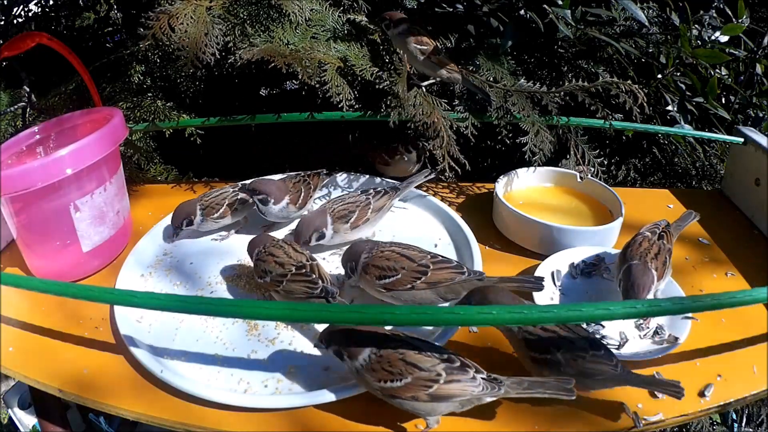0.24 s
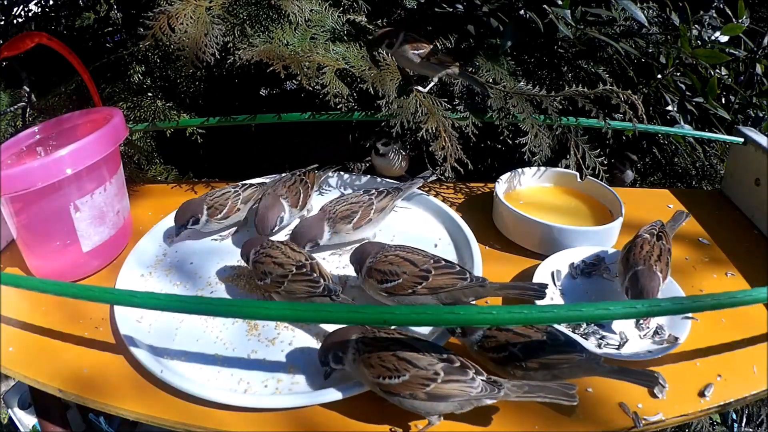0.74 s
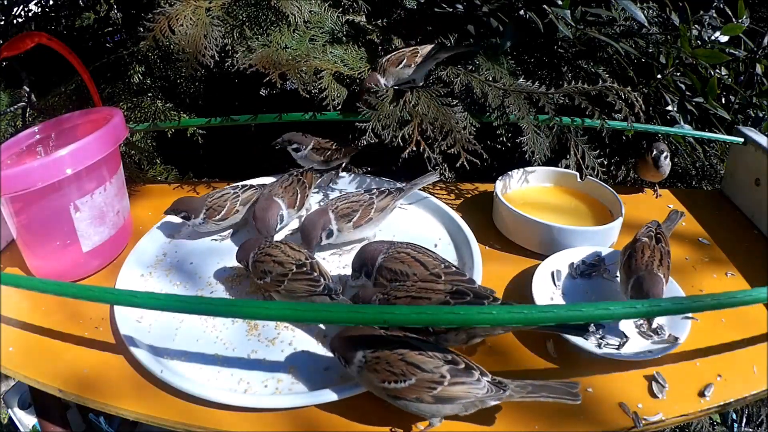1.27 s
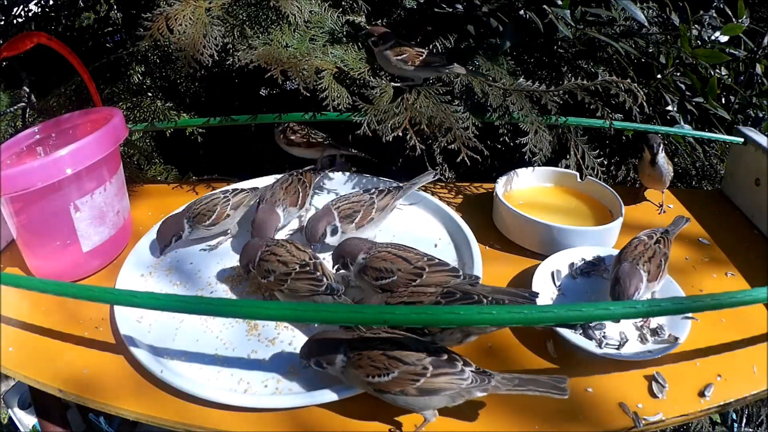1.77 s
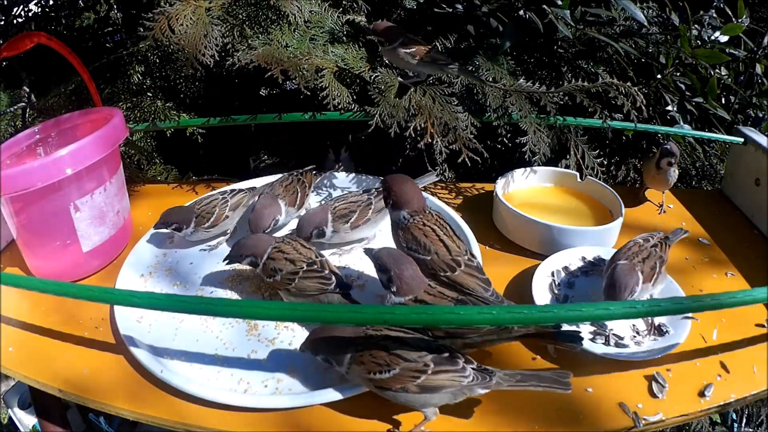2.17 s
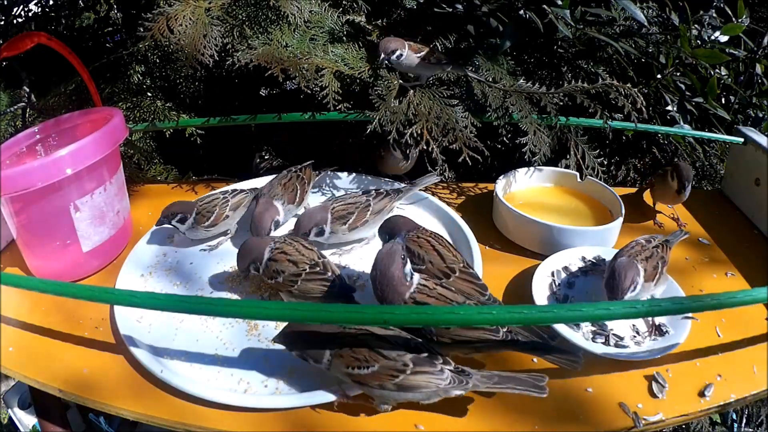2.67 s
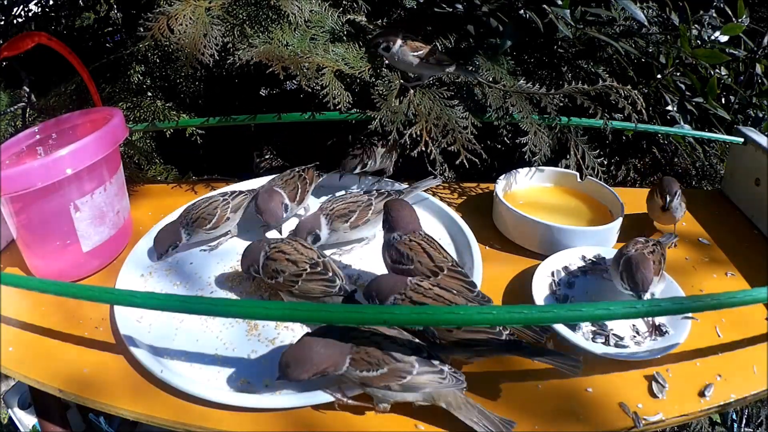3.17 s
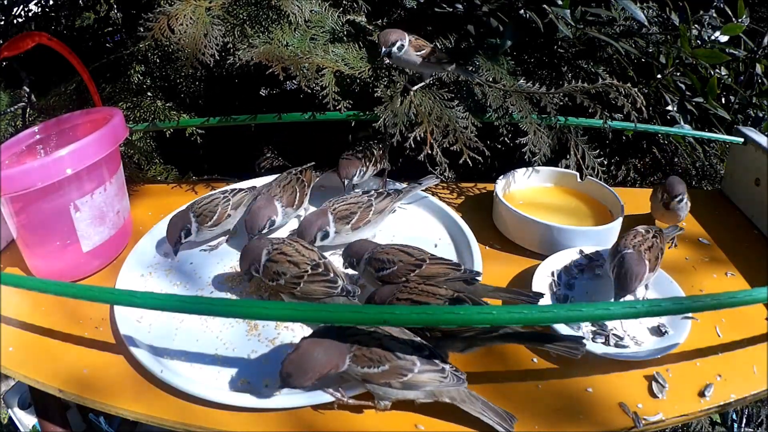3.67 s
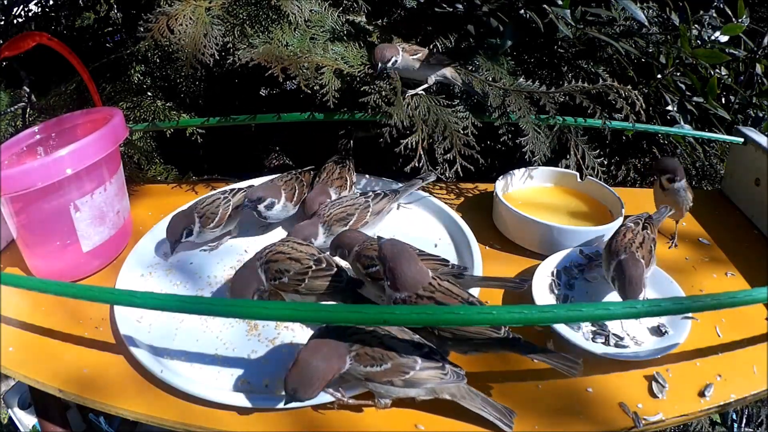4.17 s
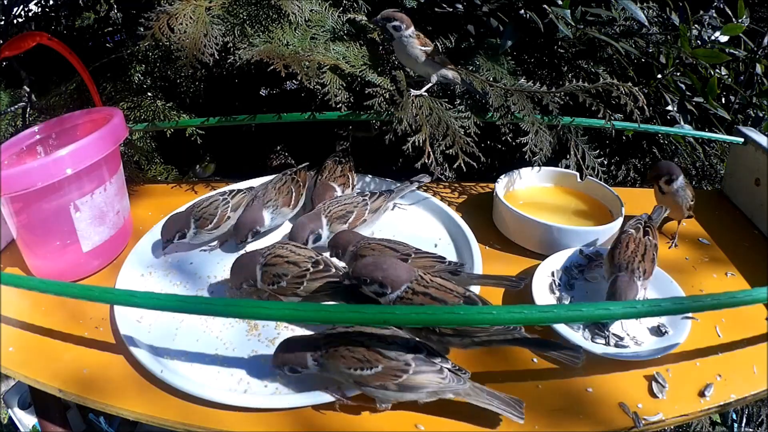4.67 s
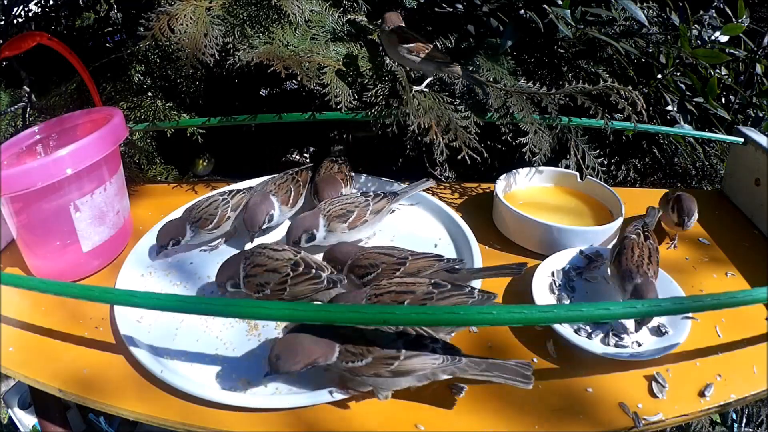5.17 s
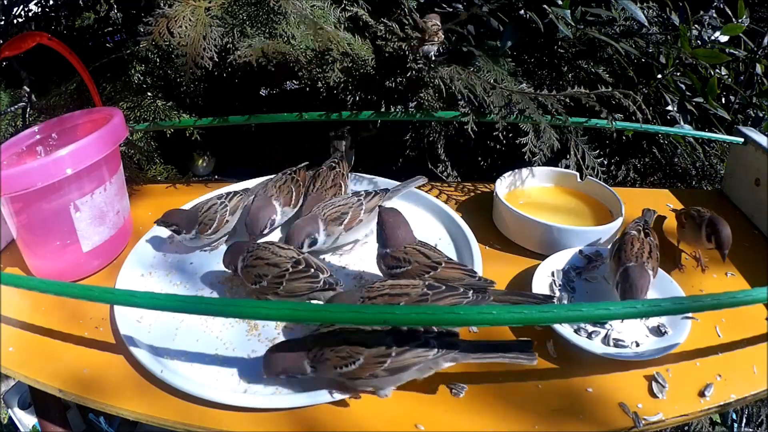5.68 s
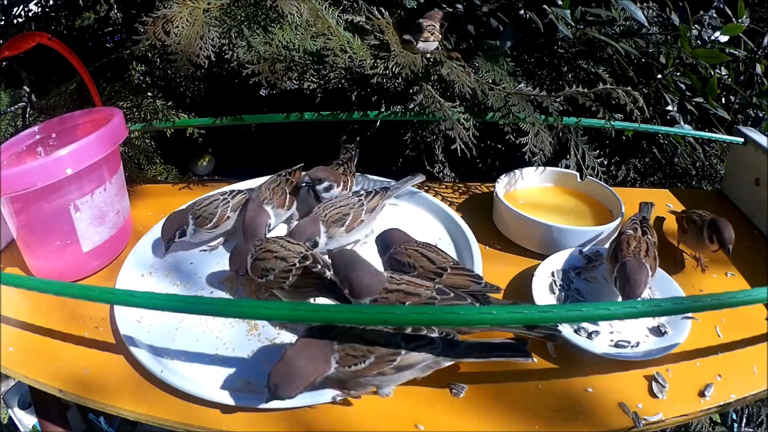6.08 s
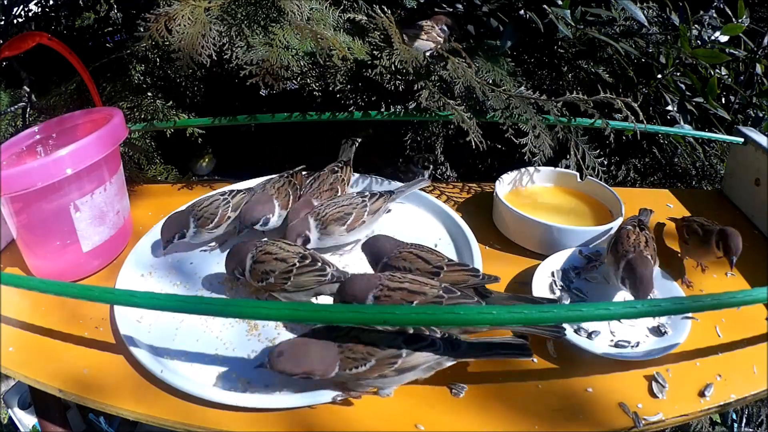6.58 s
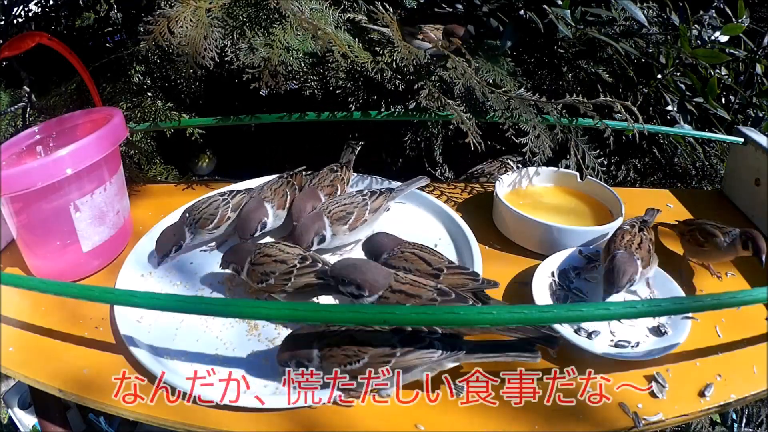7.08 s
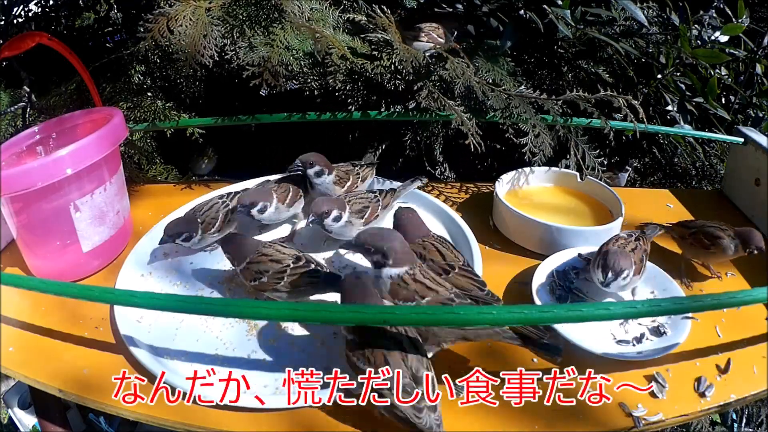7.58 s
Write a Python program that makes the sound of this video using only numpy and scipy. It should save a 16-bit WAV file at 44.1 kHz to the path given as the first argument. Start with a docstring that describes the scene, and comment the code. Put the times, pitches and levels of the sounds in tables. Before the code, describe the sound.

Sparrows peck busily at a ringing plate and small dish, with sparse chirps and seed cracks, before a sudden flutter of wings at the end.

```python
"""Sparrows peck at a plate on a garden table: each peck rings the plate's modes (its natural tones).
A small dish rings higher. Filtered noise makes seed crunches, snaps, table bumps and leafy air.
Calls are gliding whistles, squeaks have overtones, and water-like gurgles are short ringing tones.
Near the end birds take off, as noise pulsing with the wing beats. All is heard in close stereo."""
import sys
import numpy as np
from scipy import signal
from scipy.fft import rfft, irfft, next_fast_len
from scipy.io import wavfile
from scipy.ndimage import uniform_filter1d

SR = 44100
rng = np.random.default_rng(int(sys.argv[2]) if len(sys.argv) > 2 else 0)


def dump(signal):
    """Clip the signal to [-1, 1] and save it as 16-bit WAV at the path in sys.argv[1]."""
    limited = np.clip(np.atleast_2d(signal).T, -1, 1)
    pcm = np.round(limited * 32767).astype(np.int16)
    wavfile.write(sys.argv[1], SR, pcm)


N = 345303
TIME = np.arange(N) / SR  # seconds

# All levels in the tables are relative: settings in scene() shift many of them.
# t60 is the time a sound takes to fade by 60 dB.

# soft outdoor air and leaves: (frequency [Hz], level [dB])
GARDEN_SPECTRUM = [(25, -19), (100, -1), (330, 1), (700, -3.5), (1200, -9), (2000, -13), (2800, -9.5),
                   (4000, -15.5), (5000, -26), (5800, -49.5)]
# microphone hiss: (frequency [Hz], level [dB])
HISS_SPECTRUM = [(2000, -11.5), (5700, -11.5), (7000, -3), (9500, -1), (12000, -9.5), (15000, -22)]
GARDEN_DB = -55
# hollow blips, like water gurgling nearby: (time [s], pitch [Hz], level [dB])
GURGLES = [(3.284, 331, -39), (3.662, 496, -41), (4.942, 397, -38.5), (5.728, 317, -40.5),
           (6.283, 321, -39), (7.18, 347, -38.5)]

# birds take off past the microphone: (nearest moment [s], feather rustle [dB], downwash [dB])
TAKE_OFFS = [(7.56, -45.5, -58), (7.725, -48.5, -52), (7.807, -44, -34)]
# rustle of feathers: (frequency [Hz], level [dB])
RUSTLE_SPECTRUM = [(100, -1), (300, 6), (900, 3.5), (1700, -5), (2800, 9), (4200, -0.5), (5700, -23),
                   (9500, -15.5), (14000, -50)]
# draught pushed down by the wings: (frequency [Hz], level [dB])
DOWNWASH_SPECTRUM = [(20, -14), (50, -6.5), (85, 2), (160, -1), (300, -13), (900, -52)]
RUSTLE_APPROACH_DB_PER_S, LEAVE_DB_PER_S = 170, 135
DOWNWASH_APPROACH_DB_PER_S = 600  # the draught is felt only close by

# thin squeaks: (start [s], end [s], level [dB])
SQUEAKS = [(2.085, 2.221, -49.5), (7.458, 7.527, -47.5)]
# squeak tones from the lowest up: (level [dB])
SQUEAK_OVERTONES = [1, -11, -16.5, -21.5]
SQUEAK_HZ = 2557

# calls that arch up to a top pitch and fall away: (start [s], rise [s], fall [s], start pitch [Hz],
# top pitch [Hz], end pitch [Hz], level [dB], swell from start to end [dB], hidden by foliage [0-1])
CALLS = [(0.561, 0.013, 0.015, 2900, 3200, 2780, -38.5, -3, 0.43),
         (0.948, 0.015, 0.059, 3950, 4240, 2410, -49, 0, 1),
         (1.301, 0.041, 0.025, 2510, 3150, 2820, -44, -14, 0.9),
         (2.484, 0.12, 0.072, 4160, 4880, 2110, -46, 21, 0),
         (4.515, 0.0416, 0.023, 4300, 4650, 4600, -48.5, 7, 0.2),
         (4.590, 0.026, 0.083, 4300, 4950, 2140, -36.5, 10.5, 0),
         (4.796, 0.0081, 0.041, 4610, 4650, 3680, -48, 4, 0.15),
         (4.850, 0.042, 0.11, 2380, 2780, 2125, -42.5, -6, 0.04),
         (4.964, 0.0093, 0.028, 4470, 4570, 4100, -53, 0, 0.1),
         (5.179, 0.024, 0.017, 2430, 3230, 2880, -42.5, -12, 0.55),
         (6.574, 0.008, 0.04, 4430, 4620, 2730, -44.5, 5, 0.9)]
RISE_CURVE, FALL_CURVE = 0.84, 2.3  # the pitch climbs almost evenly, then drops ever faster
CALL_FADE_S = 0.0065
CALL_EDGE_HZ = 4740  # the whistle thins out above this pitch

# husks and wing tips snap: (time [s], body [dB], treble [dB])
SNAPS = [(0.1065, -40, -59), (0.1224, -29.5, -53), (0.7245, -38.5, -55.5), (1.1504, -45, -50),
         (1.732, -62, -50), (2.0947, -42, -48), (2.2177, -26.5, -41.5), (2.2888, -42, -60),
         (2.7127, -35, -49), (3.1487, -41.5, -58.5), (4.303, -38.5, -60), (5.4647, -31, -44.5),
         (6.101, -46, -49), (7.5428, -35, -45.5), (7.5725, -26, -39.5), (7.615, -36.5, -46),
         (7.636, -34.5, -41), (7.6928, -37, -45)]
# body of a snap, also the crunch of seed: (frequency [Hz], level [dB])
SNAP_BODY_SPECTRUM = [(500, -24.5), (1800, -14.5), (2800, -0.5), (4100, -7), (4900, -13), (5800, -39),
                      (12000, -52)]
# treble of a snap: (frequency [Hz], level [dB])
SNAP_TREBLE_SPECTRUM = [(3000, -24), (6000, 0), (7500, 5), (10000, 7.5), (11500, -9), (15000, -26)]

# feet and bodies bump the table: (time [s], clack [dB], thud [dB])
KNOCKS = [(0.1225, -38.5, -51.5), (0.529, -41, -39.5), (2.614, -48, -51), (2.679, -25, -34.5),
          (2.799, -40, -65), (5.227, -47, -50), (7.564, -44, -42), (7.814, -44.5, -42)]
# clack of the board, also the tick of a peck: (frequency [Hz], level [dB])
CLACK_SPECTRUM = [(50, -26), (200, -15), (600, -0.5), (1100, 1.5), (1550, -1.5), (2400, -2.5), (3000, -2),
                  (4000, -15.5), (4900, -32), (6000, -53), (9500, -31.5), (14000, -60)]
# low thud of the table: (frequency [Hz], level [dB])
THUD_SPECTRUM = [(45, -54), (120, -42), (190, 5), (300, 6.5), (500, 1.5), (800, -5.5), (2000, -48)]

# beak on the small dish: (time [s], level [dB])
DISH_PECKS = [(1.514, -50), (1.725, -44.5), (1.915, -43), (2.078, -47.5), (2.1138, -40), (2.5773, -42.5),
              (2.7667, -42.5), (3.031, -47.5), (3.125, -46.5), (4.507, -51), (4.744, -44.5), (4.842, -44),
              (5.0696, -46), (5.7236, -46.5), (5.804, -46.5), (6.4967, -48.5), (6.7242, -51),
              (6.8635, -53.5), (6.937, -49), (7.727, -44)]
# modes of the dish: (frequency [Hz], level [dB], t60 [s])
DISH_MODES = [(1556, -2, 0.059), (2524, -1, 0.11), (2777, -1, 0.11), (3470, -20, .012), (3940, -1.5, 0.075),
              (4870, -17, .02)]

# beak on the plate: (time [s], strength [dB], place round the rim [degrees])
PECKS = [(0.2204, -35, 24), (0.2334, -39.5, 42), (0.4319, -32.5, 67), (0.5894, -37.5, 172),
         (0.7472, -39, 120), (0.8315, -38.5, 74), (0.8784, -34.0, 163), (0.9263, -36.5, 66),
         (0.9394, -45, 60), (1.0909, -35.5, 166), (1.1044, -43, 54), (1.1578, -40.5, 11),
         (1.2915, -37, 115), (1.4007, -42.5, 127), (1.5319, -42, 145), (1.6008, -46.5, 62),
         (1.6207, -43, 148), (1.6661, -43.5, 130), (1.7898, -41.5, 82), (1.8113, -39, 159),
         (1.9619, -40, 150), (2.0208, -32, 34), (2.1484, -39.5, 150), (2.4014, -39, 76),
         (2.8669, -42.5, 107), (2.9632, -40.5, 88), (3.2136, -47.5, 140), (3.2475, -43.5, 73),
         (3.4116, -40, 68), (3.454, -38, 73), (3.4734, -45.5, 69), (3.5074, -36.5, 97), (3.6326, -44, 131),
         (3.676, -45, 150), (3.708, -42.0, 125), (3.8736, -40.5, 58), (3.922, -35.0, 36),
         (4.0392, -39, 38.2), (4.0911, -37.5, 66), (4.1155, -39, 124), (4.1934, -46, 205),
         (4.2532, -42, 143), (4.4218, -38, 117.5), (4.4727, -43.5, 68), (4.5511, -44, 56),
         (4.6354, -33.0, 152), (4.7654, -46.0, 61), (4.8544, -38, 104), (4.9244, -35.5, 120),
         (4.9731, -39.5, 150), (5.0888, -41.5, 38), (5.1038, -40.5, 35), (5.1567, -39.5, 144),
         (5.3462, -35.5, 34), (5.442, -36, 35), (5.671, -36.5, 135), (5.8721, -37.5, 35),
         (5.9963, -37, 107), (6.098, -39.5, 65), (6.3435, -32.5, 60), (6.3954, -40, 99),
         (6.5884, -35.5, 77), (6.6628, -41.0, 172), (6.9731, -40.5, 122), (7.0125, -45.5, 57),
         (7.236, -38.5, 166), (7.2903, -38.5, 101), (7.4525, -40, 122), (7.5068, -32.0, 127)]
# modes of the plate, one list per family: (frequency [Hz], level [dB], t60 [s])
PLATE_FAMILIES = [
    [(765.6, 2.5, 0.13), (900, -8, 0.12)],
    [(1510.6, 5, 0.093), (1570, 8.5, 0.011)],
    [(2406.4, 3.5, 0.092), (2353, -1, 0.093)],
    [(2671, 5.5, 0.035), (2913, 4, 0.012), (3476, 1, 0.042), (3850, 0, 0.036), (4097, -7.5, 0.033),
     (4840, -14.5, 0.055), (5200, -19.5, 0.06), (5420, -16, 0.035)],
]
# how the three low families bend the rim in waves; a peck on a crest rings them,
# one on a node (a still point) hardly does: (waves round the rim [count], offset [degrees])
RIM_WAVES = [(2, 0), (3, 60), (4, 150)]
NODE_DB = -19.5  # what still rings on a node
GRAZE_LEAD_S, GRAZE_DB = 0.012, -26.5  # typical lead: the beak brushes the seed before it lands
REBOUND_S, REBOUND_DB = 0.01, -14  # typical delay: it touches again as it closes

# the two microphone ports resonate at different pitches:
# (frequency [Hz], left minus right [dB], left lead [radians])
PORTS = [(100, 3, 0.28), (515, 3, 0.55), (1480, 5, 0.16), (2420, 9.5, 1), (2720, 14, -0.83),
         (3470, 5.5, -1.95), (3550, -3, -1.5), (4470, -10, -0.75), (4840, -9.5, -1.67), (6040, -4, 0.13),
         (10200, -1, -0.67)]


def from_db(db):
    """Turn decibels into gain."""
    return 10 ** (np.asarray(db) / 20)


def rms_one(x):
    """Scale to unit power."""
    return x / np.sqrt(np.mean(x ** 2) + 1e-20)


def at_hz(points, hz, axis=1):
    """Read one column of a spectrum between its points, on a log-frequency axis."""
    points = np.array(points)
    return np.interp(np.log(hz + 1), np.log(points[:, 0]), points[:, axis])


def colour(x, spectrum, size=2048):
    """Filter with the given spectrum and unit energy; minimum phase puts the energy early."""
    cepstrum = irfft(np.log(from_db(at_hz(spectrum, np.fft.rfftfreq(size, 1 / SR)))))
    # fold the cepstrum forward in time, so nothing sounds before its cause
    cepstrum[1:size // 2] *= 2
    cepstrum[size // 2 + 1:] = 0
    response = irfft(np.exp(rfft(cepstrum)))
    response /= np.linalg.norm(response)
    return signal.oaconvolve(np.atleast_2d(x), [response], axes=-1)[:, :N]


def white(alike):
    """Stereo white noise; alike is the share of power common to both sides."""
    alike = np.clip(alike, 0, 1)
    shared = np.sqrt(alike) * rng.standard_normal(N)
    return shared + np.sqrt(1 - alike) * rng.standard_normal((2, N))


def noise(spectrum, alike):
    """Steady coloured stereo noise."""
    return colour(white(alike), spectrum)


def drift(rate):
    """Smooth random wander of spread 1; a higher rate [Hz] wanders faster."""
    r = np.exp(-2 * np.pi * rate / SR)
    return rms_one(signal.lfilter([1], [1, -2 * r, r * r], rng.standard_normal(N)))


def clicks(times, heights):
    """One single-sample click per contact."""
    out = np.zeros(N)
    places = np.clip(np.round(times * SR).astype(int), 0, N - 1)
    np.add.at(out, places, heights)
    return out


def ring(x, hz, t60):
    """A unit click sets a fading sine of height 1 ringing."""
    r = from_db(-60 / (t60 * SR))
    w = 2 * np.pi * hz / SR
    return signal.lfilter([0, np.sin(w)], [1, -2 * r * np.cos(w), r * r], x + 1e-18)


def burst(x, t60, alike):
    """Each click starts a puff of white noise that dies away."""
    r = from_db(-60 / (t60 * SR))
    envelope = signal.lfilter([1], [1, -r], np.abs(x) + 1e-18)
    return envelope * white(alike)


def soften(x, edge_hz, order=6):
    """Cut the treble above an edge, as when a beak stays in contact for a moment."""
    return signal.sosfilt(signal.butter(order, edge_hz, fs=SR, output="sos"), x)


def pan(x, left_minus_right_db):
    """Make one side louder than the other."""
    return x * from_db([[left_minus_right_db / 2], [-left_minus_right_db / 2]])


def garden(swell_db, hiss_db):
    """Outdoor air and leaves, wandering in level, over each microphone's own hiss."""
    level = from_db(GARDEN_DB + swell_db * drift(17.7))
    air = level * noise(GARDEN_SPECTRUM, alike=0.78)
    return air + from_db(hiss_db) * noise(HISS_SPECTRUM, alike=0)


def hedge(x, t60, delay_s, size=16384):
    """Hedge and wall scatter sound into a fading noise tail, different on each side."""
    t = TIME[:size]
    tails = rng.standard_normal((2, size)) * from_db(-60 * t / t60) * (t > delay_s)
    tails /= np.linalg.norm(tails[0])
    return signal.fftconvolve(np.atleast_2d(x), tails, axes=-1)[:, :N]


def gurgle(per_s, level_db, spread_db, cycles, count=14):
    """Bubbles ring at low, hollow pitches; each fades by 60 dB over the given number of cycles."""
    out = np.zeros(N)
    for s, hz, db in GURGLES:
        out += ring(clicks(np.array([s]), from_db(db)), hz, cycles / hz)
    # fainter bubbles at random moments
    for hz in np.geomspace(230, 640, count):
        times = rng.uniform(0, N / SR, 200)
        born = rng.random(len(times)) < per_s * N / SR / count / len(times)
        spread = spread_db * np.clip(rng.standard_normal(len(times)), -2, 2)
        out += ring(clicks(times, from_db(level_db + spread) * born), hz, cycles / hz)
    return soften(out, edge_hz=970, order=2)


def fly_by(s, db, approach_db_per_s):
    """Gain that grows until a bird is nearest and fades as it leaves."""
    return from_db(db - np.maximum(approach_db_per_s * (s - TIME), LEAVE_DB_PER_S * (TIME - s)))


def wings(beat_hz, beat_db):
    """Feather noise swells on every wing beat and the downwash buffets the microphone."""
    rustle = sum(fly_by(s, db, RUSTLE_APPROACH_DB_PER_S) for s, db, _ in TAKE_OFFS)
    wash = sum(fly_by(s, db, DOWNWASH_APPROACH_DB_PER_S) for s, _, db in TAKE_OFFS)
    beat = beat_db * np.sin(2 * np.pi * beat_hz * TIME + drift(16.0))
    feathers = rustle * from_db(beat) * noise(RUSTLE_SPECTRUM, alike=0.95)
    return feathers + wash * noise(DOWNWASH_SPECTRUM, alike=0.89)


def squeaks(waver, flutter_db):
    """A stuttering squeak around one pitch, with a row of overtones at whole multiples."""
    gate = sum(from_db(db) * ((TIME > start) & (TIME < end)) for start, end, db in SQUEAKS)
    phase = 2 * np.pi * np.cumsum(SQUEAK_HZ * (1 + waver * drift(206))) / SR
    tone = np.zeros(N)
    for multiple, db in enumerate(SQUEAK_OVERTONES, start=1):
        level = from_db(db + flutter_db * np.tanh(drift(70)))
        tone += level * np.sin(multiple * phase)
    return uniform_filter1d(gate, size=300) * tone  # rounded edges avoid clicks


def calls(waver, flutter_db, octave_db):
    """Arching near-sine whistles with a faint octave: all that is sung, and the unhidden part."""
    sung, direct = np.zeros((2, N))
    wobble = 1 + waver * drift(109)
    flutter = flutter_db * np.tanh(drift(70))
    for start, rise, fall, start_hz, top_hz, end_hz, db, swell_db, hidden in CALLS:
        length = rise + fall
        on = (TIME > start) & (TIME < start + length)
        t = TIME[on] - start
        climb = np.maximum(1 - t / rise, 0) ** RISE_CURVE
        drop = np.maximum((t - rise) / fall, 0) ** FALL_CURVE
        hz = top_hz - (top_hz - start_hz) * climb - (top_hz - end_hz) * drop
        phase = 2 * np.pi * np.cumsum(hz * wobble[on]) / SR
        fade = np.minimum(np.minimum(t, length - t) / CALL_FADE_S, 1)
        level = from_db(db + swell_db * (t / length - .5) + flutter[on]) * fade
        # where the whistle thins, its octave comes out
        full = 1 / (1 + (hz / CALL_EDGE_HZ) ** 20)
        octave = (1 - full) * from_db(octave_db) * np.sin(2 * phase)
        whistle = level * (full * np.sin(phase) + octave)
        sung[on] += whistle
        direct[on] += whistle * (1 - np.clip(hidden, 0, 1))
    return np.sqrt(2) * sung, np.sqrt(2) * direct


def snaps(crack_db, body_db, treble_db):
    """Dry cracks: one sharp break and a few milliseconds of splintering noise."""
    s, body, treble = np.transpose(SNAPS)
    low = clicks(s, from_db(body + body_db))
    high = clicks(s, from_db(treble + treble_db))
    low_crack = from_db(crack_db) * low + burst(low, t60=0.023, alike=0.86)
    high_crack = from_db(crack_db) * high + burst(high, t60=0.022, alike=0.084)
    return colour(low_crack, SNAP_BODY_SPECTRUM) + colour(high_crack, SNAP_TREBLE_SPECTRUM)


def table(strike_db, clack_db, thud_db):
    """A bump gives a sharp contact, a dense clack of the board, and a longer low thud."""
    s, clack, thud = np.transpose(KNOCKS)
    hits = clicks(s, from_db(clack))
    board = from_db(strike_db) * hits + from_db(clack_db) * burst(hits, t60=0.13, alike=0.76)
    low = burst(clicks(s, from_db(thud + thud_db)), t60=0.28, alike=0.85)
    return colour(board, CLACK_SPECTRUM) + colour(low, THUD_SPECTRUM)


def nibbling(per_s, crumbs_per_s, ring_db, husk_db, spread_db):
    """Claws and rolling seed touch faintly at random: small plate rings and puffs of noise."""
    sizes = from_db(spread_db * np.clip(rng.standard_normal(N), -2, 2))
    touches = sizes * (rng.random(N) < per_s / SR)
    rings = np.zeros(N)
    for family in PLATE_FAMILIES:
        hz, db, t60 = family[0]
        rings += ring(touches * from_db(db), hz, t60)
    crumbs = sizes * (rng.random(N) < crumbs_per_s / SR)
    puffs = burst(crumbs, t60=0.016, alike=0.14)
    husks = colour(puffs, SNAP_BODY_SPECTRUM) + from_db(-19.5) * colour(puffs, SNAP_TREBLE_SPECTRUM)
    return from_db(ring_db) * rings + from_db(husk_db) * husks


def dish(level_db, scatter_db, grit_db, pan_db):
    """Pecks ring the modes of the small dish, with a short crunch of seed."""
    s, level = np.transpose(DISH_PECKS)
    rings = np.zeros(N)
    for hz, db, t60 in DISH_MODES:
        scatter = rng.standard_normal(len(s)) * scatter_db
        rings += ring(clicks(s, from_db(level + level_db + db + scatter)), hz, t60)
    crunch = burst(clicks(s, from_db(level + grit_db)), t60=0.02, alike=0.53)
    return pan(soften(rings, edge_hz=5500) + colour(crunch, SNAP_BODY_SPECTRUM), pan_db)


def mode_shapes(degrees):
    """Level [dB] at which a peck at this place drives each family; upper modes answer anywhere."""
    crests = [np.cos(np.radians(waves * degrees + offset)) for waves, offset in RIM_WAVES]
    return [20 * np.log10(np.hypot(crest, from_db(NODE_DB))) for crest in crests] + [0]


def plate(family_db, scatter_db, grit_db, tick_db, pan_db):
    """Pecks ring the plate's modes by where they land; seed crunches briefly under the beak."""
    s, strength, degrees = np.transpose(PECKS)
    graze, rebound = rng.uniform(.5, 1.5, (len(s), 2)).T  # timing varies from peck to peck

    def touches(db):
        """Graze, blow and rebound of every peck."""
        before = clicks(s - GRAZE_LEAD_S * graze, from_db(db + GRAZE_DB))
        after = clicks(s + REBOUND_S * rebound, from_db(db + REBOUND_DB))
        return before + clicks(s, from_db(db)) + after

    rings = np.zeros(N)
    for modes, shape, trim in zip(PLATE_FAMILIES, mode_shapes(degrees), family_db):
        for k, (hz, db, t60) in enumerate(modes):
            # the first mode of a family stays steady, the others vary
            scatter = rng.standard_normal(len(s)) * scatter_db * (k > 0)
            blows = touches(strength + shape + trim + db + scatter)
            # neighbouring modes start in opposite phase, so the ring swells for a moment
            rings += (-1) ** k * ring(blows, hz, t60)
    crunch = burst(touches(strength + grit_db), t60=0.036, alike=0.6)
    tick = burst(touches(strength + tick_db), t60=0.032, alike=0.87)
    contact = colour(crunch, SNAP_BODY_SPECTRUM) + colour(tick, CLACK_SPECTRUM)
    return pan(soften(rings, edge_hz=5100) + contact, pan_db)


def scene():
    """Everything on the table, with a little scatter from the garden; callers sit in the hedge."""
    pecks = plate(family_db=[-1.0, -2.5, 2.5, -4.0], scatter_db=5, grit_db=-6.0, tick_db=-6, pan_db=1.5)
    pecks += dish(level_db=1.5, scatter_db=2, grit_db=7.0, pan_db=0.0)
    pecks += nibbling(per_s=14, crumbs_per_s=35, ring_db=-58.5, husk_db=-51.0, spread_db=5.5)
    bumps = table(strike_db=21.5, clack_db=6.0, thud_db=3.5)
    bumps += snaps(crack_db=14, body_db=2, treble_db=-3.5)
    sung, direct = calls(waver=0.016, flutter_db=4.0, octave_db=-25)
    near = pecks + bumps + squeaks(waver=0.0085, flutter_db=12.0) + wings(beat_hz=24, beat_db=4.0)
    scatter = from_db(-13.5) * hedge(near, t60=0.19, delay_s=0.0058)
    scatter += from_db(-4) * hedge(sung, t60=0.23, delay_s=0.005)
    water = gurgle(per_s=20, level_db=-53.0, spread_db=5.0, cycles=31.5)
    return near + direct + scatter + water + garden(swell_db=3.0, hiss_db=-73.0)


def record(dry):
    """The ports share out each pitch between left and right; a narrow notch and a top cut follow."""
    size = next_fast_len(N + 4096)
    hz = np.fft.rfftfreq(size, 1 / SR)
    # each side takes half of the level and phase difference
    half = from_db(at_hz(PORTS, hz) / 2) * np.exp(.5j * at_hz(PORTS, hz, axis=2))
    ports = np.array([half, 1 / half])
    ports /= np.sqrt(np.mean(np.abs(ports) ** 2, axis=0))
    heard = irfft(rfft(dry, size) * ports, size)[:, :N]
    heard = signal.lfilter(*signal.iirnotch(7920, 22, fs=SR), heard)
    # steep cut: 60 dB down from 16100 Hz upward
    return signal.sosfilt(signal.cheby2(12, 60, 16100, fs=SR, output="sos"), heard)


dry = scene()
out = record(dry)
dump(out)
```